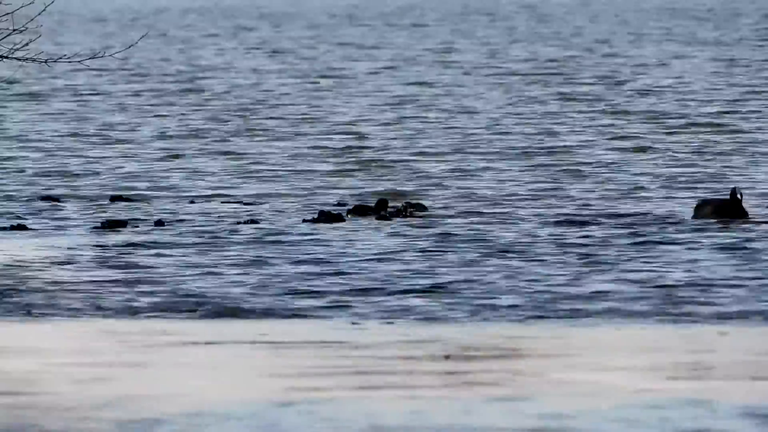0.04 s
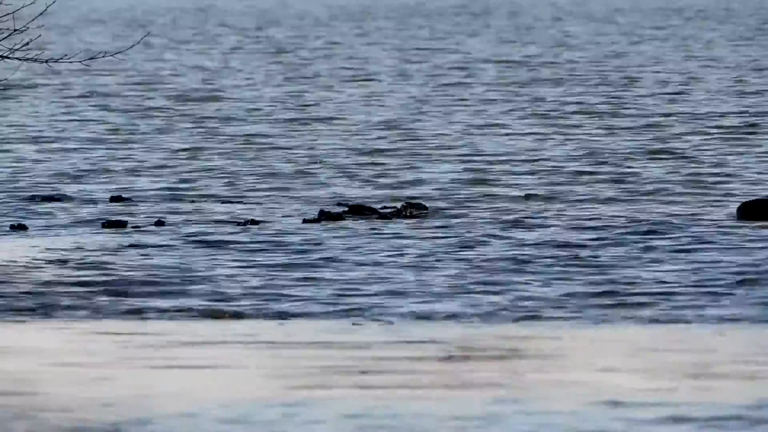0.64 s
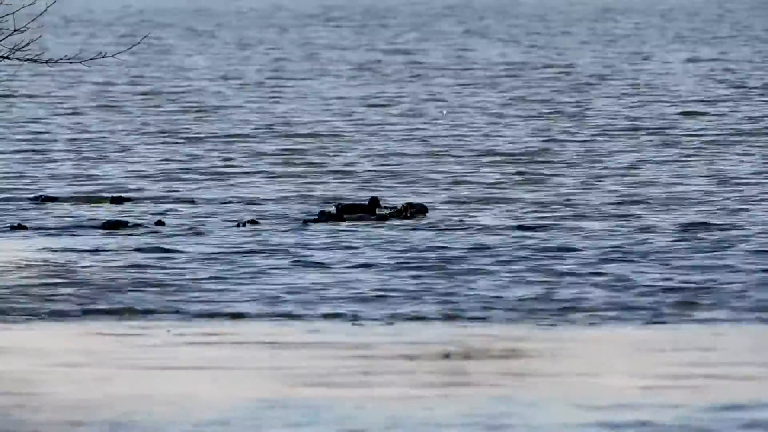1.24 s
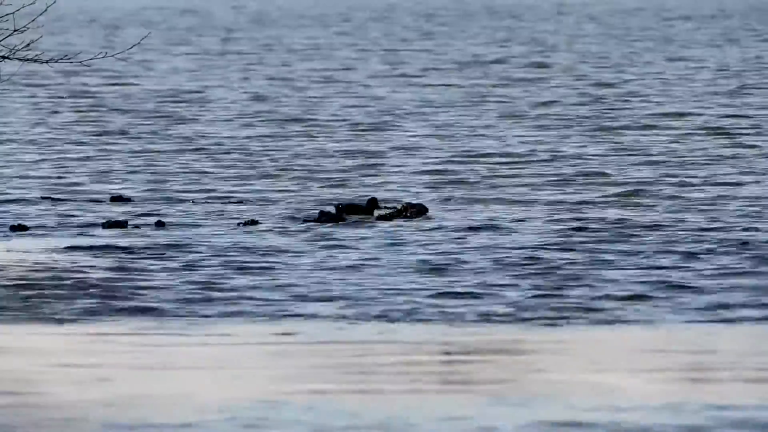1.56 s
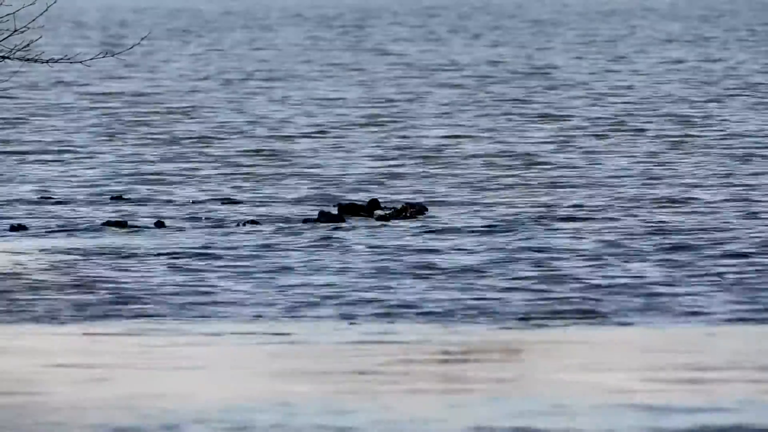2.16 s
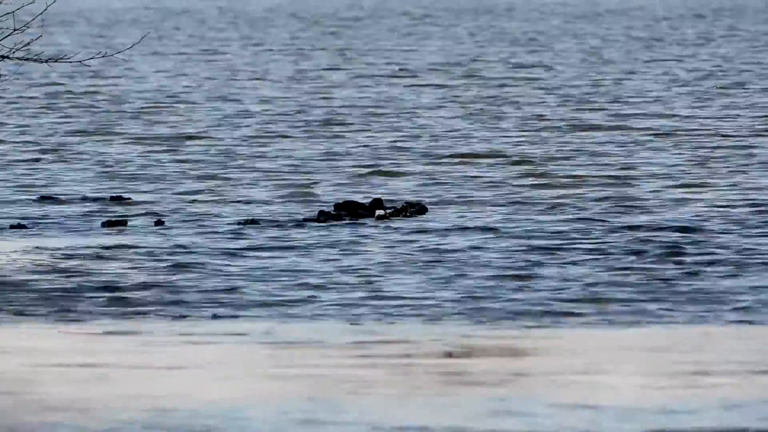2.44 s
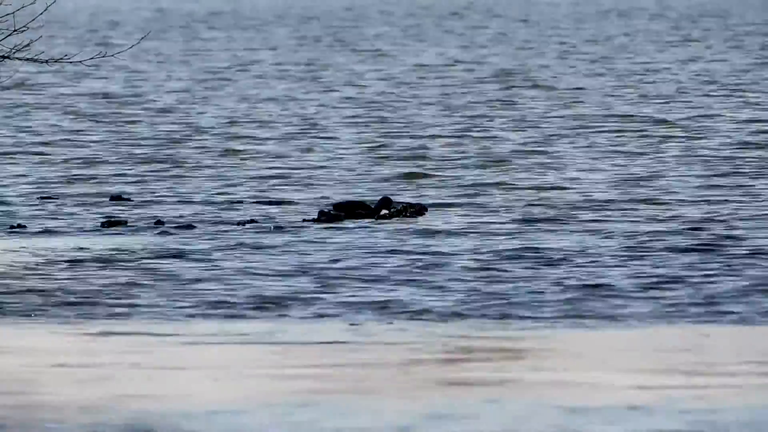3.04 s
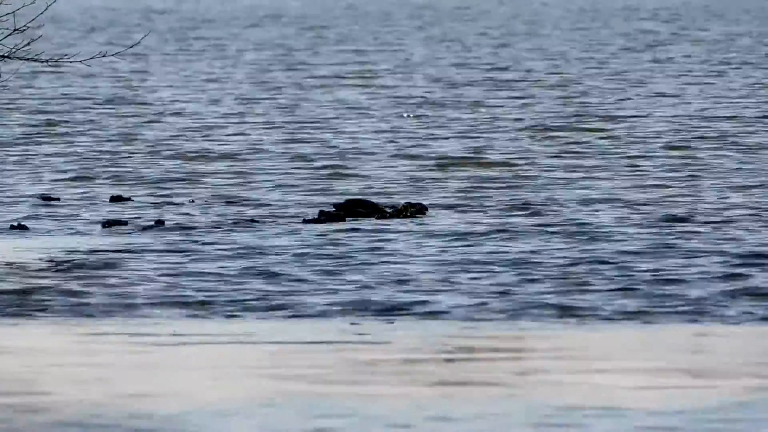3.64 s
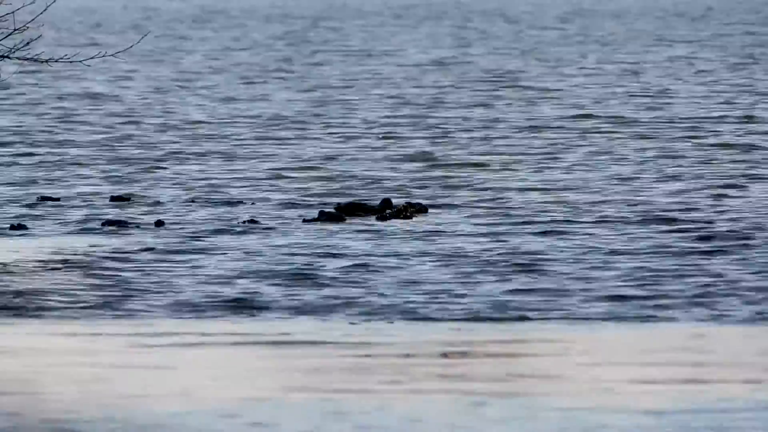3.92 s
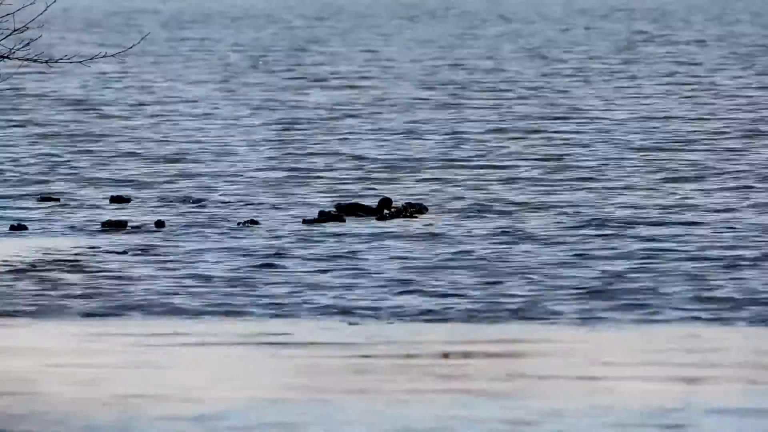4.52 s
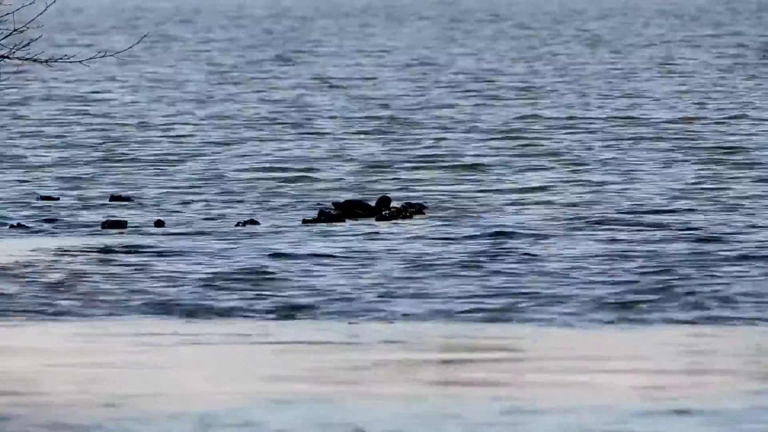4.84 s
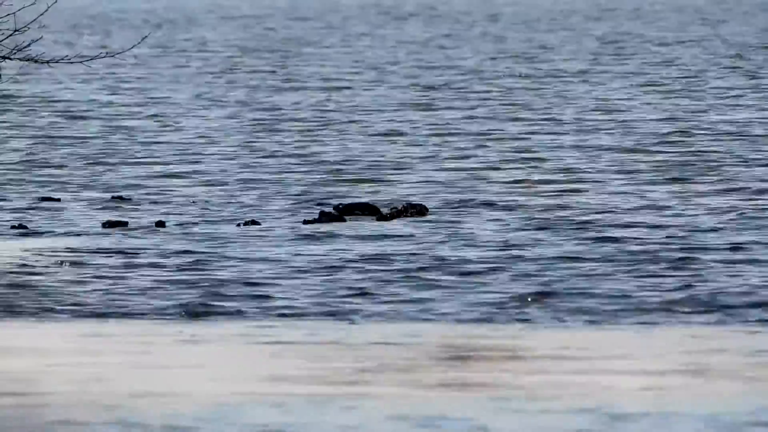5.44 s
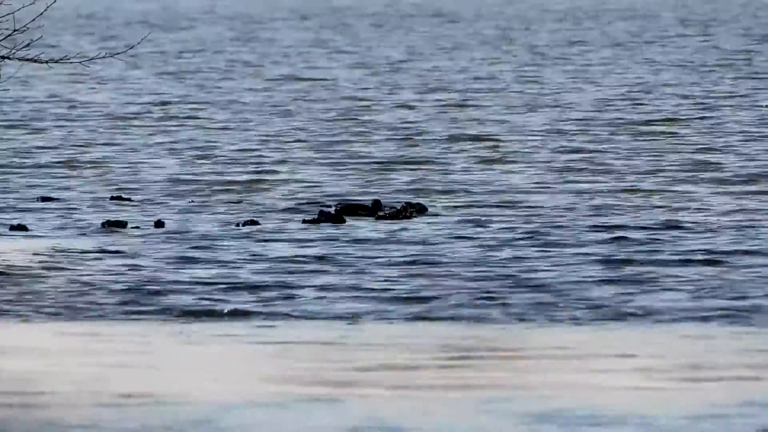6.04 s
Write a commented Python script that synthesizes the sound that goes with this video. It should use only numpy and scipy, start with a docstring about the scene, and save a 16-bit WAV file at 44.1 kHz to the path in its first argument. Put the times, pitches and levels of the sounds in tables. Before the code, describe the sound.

On the shore of a partly frozen lake, a breeze rumbles and flutters unevenly on the microphone over a soft wash of open air. In the first half, coots give a few faint, short, hoarse yelps far out on the water. Later, ripples swell gently and one small wave slaps under the ice edge with a low gulp. A light tap on the camera follows as the wind grows a little stronger.

```python
"""The shore of a breezy, partly frozen lake, heard through a camera's two microphones.
Wind rumbles on them over a far wash of open air. The lens stabiliser whirrs; the camera is tapped.
Ripples wash up to the ice edge, one slaps under it, trapped air gulps, and there are tiny ticks.
Out on the water, coots give a few faint, hoarse yelps, each trailed by short echoes."""
import sys
import numpy as np
from scipy import signal
from scipy.io import wavfile
from scipy.ndimage import uniform_filter1d

SR = 44100
rng = np.random.default_rng(int(sys.argv[2]) if len(sys.argv) > 2 else 0)


def generate_wav(signal):
    """Clip the signal to [-1, 1] and save it as 16-bit WAV at the path in sys.argv[1]."""
    frames = np.transpose(np.atleast_2d(signal))
    scaled = np.clip(frames, -1, 1) * 32767
    pcm = np.round(scaled).astype(np.int16)
    wavfile.write(sys.argv[1], SR, pcm)


N = 276948
TIME = np.arange(N) / SR
SIDES = np.array([[1], [-1]])  # plus for the left channel, minus for the right

# Below, "pan" is how much louder the left side is, and "fade" is the time to die away by 60 dB.
# Tone of the far open air: (frequency [Hz], relative level [dB])
AIR_TONE = [(20, 12.5), (100, 6), (200, 4.5), (320, 2), (420, 0.5), (600, -0.5), (800, -2.5), (1050, 1.5),
            (1600, 1.5), (2100, -9.5), (2700, -9.5), (3800, -18), (6000, -25), (12000, -36)]
# How alike far sounds are on both sides: (frequency [Hz], likeness [1 same, 0 unrelated, -1 opposite])
AIR_LIKENESS = [(50, 0.54), (300, 1), (650, 0.57), (1050, 0.27), (1400, 0.1), (2500, 0.15), (4500, -0.24),
                (9000, 0)]
# Tone of the microphones' hiss: (frequency [Hz], relative level [dB])
HISS_TONE = [(100, 2.3), (2000, 3.7), (4000, 6.1), (6300, 4.1), (10000, 1.4), (15500, 0.54)]
# Notes the camera body rings at: (pitch [Hz], width [Hz], level [dB], pan [dB], left lead [radians])
BODY_NOTES = [(672, 81, -70, -2, 0.22), (1235, 77, -78.5, -1.5, 2.5), (1365, 92, -74, -2.5, 1.4),
              (1459, 70, -72.5, -3, 2), (1545, 80, -73, -1, -2.7), (1689, 124, -71.5, -4, -1.5),
              (1800, 100, -67, -4.5, -0.16), (1930, 113, -65, -7, 1.87), (2057, 120, -67, 4, 3),
              (2295, 80, -80.5, -3, 0.6), (2402, 66, -76.5, 0, 2), (2460, 50, -84, 1, 3),
              (2625, 50, -82.5, 3.5, 2), (2950, 80, -84, -1, 1), (3110, 86, -80.5, 2, 0.5),
              (3195, 110, -80, 4, 2.5), (3310, 100, -82.5, 1.5, 3), (3400, 150, -82, 1.5, 3.5)]
# Rings of a soft knock, then a fingertip tap and its bump: (time [s], pitch [Hz], level [dB], fade [s])
TAP_RINGS = [(2.761, 406, -51.5, 0.066), (2.761, 1270, -55, 0.05), (5.4945, 664, -40.5, 0.019),
             (5.4945, 1070, -40, 0.0098), (5.4945, 2400, -57, .005), (5.512, 235, -46, 0.13)]
# Tiny ticks: (time [s], pitch [Hz], width [Hz], level [dB], fade [s])
TICKS = [(1.013, 7300, 2500, -68, .035), (3.338, 3900, 800, -72, 0.026), (3.423, 13000, 4000, -72, .012),
         (5.111, 7000, 1800, -71, .03), (5.659, 7800, 2200, -68, 0.03)]
# The steady breeze: (time [s], level [dB], pan [dB])
BREEZE = [(0.0, -50, 4.5), (0.6, -51.5, 2.5), (1.35, -51.3, 2), (1.6, -50, 0), (1.85, -46, 0),
          (2.4, -48.5, -0.5), (3.0, -47, 1), (3.45, -48, 6), (4.3, -48, 2), (4.65, -48, 3),
          (5.08, -52, 3.5), (5.3, -44, 2.5), (5.85, -44.5, 0), (6.28, -44.5, 10.5)]
# Gusts on top of the breeze: (start [s], length [s], level [dB], pan [dB])
GUSTS = [(0.27, 0.22, -49.5, 16), (0.654, 0.22, -45.5, 3), (0.74, 0.35, -49, 13), (0.958, 0.23, -48, -9),
         (1.068, 0.19, -49, 12.5), (1.397, 0.17, -45, 12.5), (1.66, 0.39, -47.5, 11.5),
         (2.083, 0.3, -46.5, 12.5), (2.374, 0.16, -49, 12), (2.51, 0.13, -50, 10), (2.684, 0.12, -44, 7),
         (3.022, 0.21, -50.5, 14), (3.495, 0.26, -47.5, 13), (3.757, 0.15, -45.5, 8),
         (3.958, 0.15, -45.5, 7), (4.252, 0.17, -51, 9), (4.387, 0.16, -50.5, 14), (5.3, 0.27, -44.5, -4),
         (5.717, 0.27, -48.5, 11), (6.04, 0.29, -47, 13)]
# Tone of the rumble from big swirls of air: (frequency [Hz], relative level [dB])
RUMBLE_TONE = [(14, -4.5), (24, 0.5), (36, 0), (50, -4), (75, -10), (105, -20.5), (160, -29.5), (300, -50)]
# Tone of the flutter from small swirls: (frequency [Hz], relative level [dB])
FLUTTER_TONE = [(20, -9), (50, 3.5), (85, 4.5), (120, 3), (170, -3), (240, -9), (310, -12), (420, -23.5),
                (1000, -48)]
# How much flutter rides on the wind: (time [s], relative level [dB], pan [dB])
FLUTTER_SHARE = [(0.0, -9, -4), (0.7, -16.5, 1), (0.95, -8, 0), (1.5, -8, -5.5), (1.9, -6.5, -6),
                 (2.2, -8.5, -5), (2.47, -16, -5), (2.75, -10, -5), (3.13, -11, -15), (3.38, -15.5, -9),
                 (3.88, -14, -5), (4.06, -5.5, -3), (4.22, -12, 1), (4.5, -11, -3), (5.2, -9.5, -6),
                 (5.48, -5, -9), (5.8, -4.5, -2), (6.28, -8.5, -3)]
# Ripples washing up to the ice: (peak time [s], rise [s], fall [s], level [dB])
WASHES = [(0.5, .6, 0.62, -65.5), (0.98, 0.76, 0.51, -65.7), (4.45, 0.58, 0.53, -61.3),
          (4.84, 0.45, 0.38, -61)]
# Tone of their soft rush: (frequency [Hz], relative level [dB])
WASH_TONE = [(250, -3.5), (600, 0), (950, 5), (1400, -4), (2000, 0), (2700, -9), (4200, -21), (7000, -30),
             (12000, -42)]
# Strength of the droplets in that rush: (pitch [Hz], relative level [dB])
DROPLET_TONE = [(850, 0), (1400, -1.5), (2400, 1), (3200, -7.5), (5000, -11)]
# Gulps of air under the ice: (time [s], starting pitch [Hz], level [dB], fade [s])
GULPS = [(1.145, 244, -46.5, 0.14), (2.029, 216, -48, 0.067), (4.71, 200, -38, 0.085),
         (4.746, 182, -41.5, 0.091), (4.812, 205, -48, 0.094)]
# Noise bands of the slap under the ice: (pitch [Hz], width [Hz], level [dB], rise [s], fade [s])
SLAP_BANDS = [(177, 110, -51.5, 0.009, 0.94), (1040, 350, -53.5, 0.0037, 0.16),
              (1580, 620, -46, 0.0027, 0.15), (2480, 460, -55, .0012, 0.1), (3250, 500, -66, .004, 0.1)]
# Coot yelps: (time [s], length [s], first pitch [Hz], last pitch [Hz], level before the throat [dB],
# overtone boost [dB], roughness [0-1], direction [0 ahead, 1 left])
YELPS = [(0.922, 0.09, 967, 992, -61, -18, .3, 0.82), (1.0, 0.125, 928, 875, -60.5, -19, 0.35, 0.72),
         (1.155, 0.028, 1080, 1180, -59.5, -14, 0.1, 0.94), (1.504, 0.052, 1130, 816, -60.5, 0.5, .6, 0.89),
         (1.946, 0.056, 1131, 740, -58.5, -2.5, 0.55, 1), (2.178, 0.042, 1002, 1024, -64, -3.5, .3, -.1),
         (3.277, 0.046, 1347, 1187, -59, -14, 0.1, .4), (3.49, 0.046, 1420, 1300, -64, -10, .15, .4)]
# How a coot's throat boosts or softens each overtone: (frequency [Hz], gain [dB])
THROAT = [(800, -5.5), (1050, 1.5), (1400, -4.5), (1850, 10.5), (2200, 0), (2800, -11), (3700, -28),
          (5000, -24), (6400, -19.5), (7500, -27)]

LEFT_DB, LEFT_LEAD_S = 2.5, 0.00019  # a sound from the left is louder and earlier on that side


def from_db(db):
    """Turn decibels into a number to multiply by."""
    return 10 ** (np.asarray(db) / 20)


def unit_power(x):
    """Scale a sound so that its average power is 1."""
    return x / np.sqrt(np.mean(np.abs(x) ** 2) + 1e-20)


def over_time(rows):
    """Join a table's points with straight lines, giving a value at every sample."""
    times, *columns = np.transpose(rows)
    return [np.interp(TIME, times, column) for column in columns]


def at_hz(points, hz):
    """Look up a frequency in a table, with octaves evenly spaced."""
    frequencies, values = np.transpose(points)
    return np.interp(np.log(hz), np.log(frequencies), values)


def drift(rate_hz):
    """A smooth random wobble, about 1 in size; a higher rate wobbles faster."""
    step, warm_up = 40, 2000
    pole = np.exp(-2 * np.pi * step * rate_hz / SR)
    noise = rng.standard_normal(N // step + warm_up + 2)
    slow = signal.lfilter([1], [1, -2 * pole, pole * pole], noise)[warm_up:]
    return np.interp(np.arange(N) / step, np.arange(len(slow)), unit_power(slow))


def shaped_noise(tone, likeness, flicker_db):
    """Stereo noise built from half-octave bands, each flickering on its own."""
    out, edges = 0, 12 * 2 ** np.arange(0, 11, 0.5)
    white = rng.standard_normal((2, 2, N))
    for k, (low, high) in enumerate(zip(edges, edges[1:])):
        if low > tone[-1][0]:
            break
        band = signal.butter(2, [low, high], "band", fs=SR, output="sos")
        shared, opposite = signal.sosfilt(band, white[k % 2])
        hz = np.sqrt(low * high)
        alike = likeness if np.isscalar(likeness) else at_hz(likeness, hz)
        gain = from_db(at_hz(tone, hz) + flicker_db * drift(9.5))
        out = out + gain * (np.sqrt(1 + alike) * shared + np.sqrt(1 - alike) * opposite * SIDES)
    return unit_power(out)


def ringing_noise(hz, width):
    """Noise that rings around one pitch, as complex numbers ready for to_stereo."""
    pole = np.exp((2j * hz - width) * np.pi / SR)
    ringing = signal.lfilter([1], [1, -2 * pole, pole ** 2], rng.standard_normal(N))
    return np.sqrt(2) * unit_power(ringing)


def to_stereo(x, pan_db, lead):
    """Send a complex wave to both microphones, the left one ahead by `lead` radians."""
    half = from_db(pan_db / 2) * np.exp(0.5j * lead)
    return np.real([x * half, x / half])


def burst(start, rise, fade, hold=0):
    """A loudness shape: rise quickly, perhaps hold, then die away."""
    age = np.maximum(TIME - start, 0)
    return (1 - np.exp(-age / rise)) * from_db(-60 * np.clip((age - hold) / fade, 0, 10))


def hump(start, rise, fall):
    """A smooth swell from 0 up to 1 and back."""
    return np.sin(np.pi / 2 * np.interp(TIME - start, [0, rise, rise + fall], [0, 1, 0]))


def evened(x, seconds=0.12):
    """Take the slow swells out of a noise."""
    return x / np.sqrt(uniform_filter1d(x ** 2, int(seconds * SR), axis=-1) + 1e-6)


def open_air():
    """Far water and land blend into one soft wash."""
    return from_db(-58.5 + 0.3 * drift(1)) * shaped_noise(AIR_TONE, AIR_LIKENESS, flicker_db=0.54)


def microphone_hiss():
    """Each microphone adds its own even hiss."""
    return from_db(-72.5) * shaped_noise(HISS_TONE, likeness=0, flicker_db=1.0)


def camera():
    """The lens stabiliser shakes the camera body; the electronics add a very faint, pulsing whine."""
    whine_hz, pulses_per_s = 14794, 25
    effort = from_db(0.5 * drift(7.4))
    whirr = sum(from_db(db) * to_stereo(ringing_noise(hz, width), pan_db, lead)
                for hz, width, db, pan_db, lead in BODY_NOTES)
    pulse = unit_power(np.cos(np.pi * pulses_per_s * TIME) ** 3)
    whine = from_db(-94.5) * np.sqrt(2) * pulse * np.exp(2j * np.pi * whine_hz * TIME)
    return effort * whirr + to_stereo(whine, pan_db=3.0, lead=-1.4)


def taps():
    """Light touches start a few rings that die almost at once."""
    rings = sum(from_db(db) * burst(start, 0.00024, fade) * np.exp(2j * np.pi * hz * (TIME - start))
                for start, hz, db, fade in TAP_RINGS)
    return to_stereo(rings, pan_db=-2.0, lead=0.72)


def ticks():
    """Tiny dry ticks close by, each a flash of high noise."""
    clicks = sum(from_db(db) * burst(start, 0.0011, fade) * ringing_noise(hz, width)
                 for start, hz, width, db, fade in TICKS)
    return to_stereo(clicks, pan_db=-0.5, lead=0.64)


def wind_strength_db():
    """The powers of the breeze and the gusts add up at each microphone."""
    breeze_db, breeze_pan_db = over_time(BREEZE)
    power = from_db(breeze_db + SIDES * breeze_pan_db / 2) ** 2
    for start, length, db, pan_db in GUSTS:
        gust = from_db(db + SIDES * pan_db / 2) * hump(start, length / 2, length / 2)
        power = power + gust ** 2
    return 10 * np.log10(power)


def wind():
    """Big swirls of air rumble on both microphones; small ones flutter mostly on each alone."""
    strength_db = wind_strength_db()
    share_db, pan_db = over_time(FLUTTER_SHARE)
    rumble_db = strength_db + 0.72
    flutter_db = strength_db - 1.06 + share_db + SIDES * pan_db / 2
    rumble = evened(shaped_noise(RUMBLE_TONE, likeness=0.45, flicker_db=2.0))
    flutter = evened(shaped_noise(FLUTTER_TONE, likeness=0.17, flicker_db=2.5))
    shoves = from_db(1.67 * drift(14))  # churning air comes in short shoves and lulls
    return shoves * (rumble * from_db(rumble_db) + flutter * from_db(flutter_db))


def droplets(per_s=450, ring_cycles=11.3, spread_db=1.5, pitch_count=24):
    """Tiny bubbles and drops along the ice edge each ring for a few cycles."""
    sizes = from_db(spread_db * np.minimum(rng.exponential(1, N), 4)) * rng.choice([-1, 1], N)
    clicks = sizes * (rng.random(N) < per_s / SR)
    pitch_choice = rng.integers(0, pitch_count, N)
    out = 0
    for k, hz in enumerate(np.geomspace(DROPLET_TONE[0][0], DROPLET_TONE[-1][0], pitch_count)):
        pole = from_db(-60 * hz / (ring_cycles * SR)) * np.exp(2j * np.pi * hz / SR)
        ring = signal.lfilter([1j], [1, -pole], clicks * (pitch_choice == k) + 1e-18)
        out = out + from_db(at_hz(DROPLET_TONE, hz)) * to_stereo(ring, rng.normal(0, 5), lead=0)
    return unit_power(out)


def ripples(pan_db=-0.5):
    """A soft rush, dotted with droplets, swells and sinks as each group of ripples reaches the ice."""
    power = sum((from_db(db) * hump(peak - rise, rise, fall) ** 2) ** 2
                for peak, rise, fall, db in WASHES)
    water = shaped_noise(WASH_TONE, AIR_LIKENESS, flicker_db=2.5) + from_db(-4) * droplets()
    return np.sqrt(power) * water * from_db(SIDES * pan_db / 2)


def gulps(rise_s=0.0041, glide_per_s=1.4):
    """Air pockets under the ice ring low and briefly, rising a little in pitch."""
    out = 0
    for start, hz, db, fade in GULPS:
        age = np.maximum(TIME - start, 0)
        cycles = hz * age * (1 + glide_per_s * age / 2)
        out = out + from_db(db) * burst(start, rise_s, fade) * np.exp(2j * np.pi * cycles)
    return to_stereo(out, pan_db=-1.0, lead=0.2)


def slap(start_s=4.701, breaking_s=0.017):
    """A small wave hits the ice edge on the left: a short splash over a hollow rumble from below."""
    out = 0
    for hz, width, db, rise, fade in SLAP_BANDS:
        splash = to_stereo(ringing_noise(hz, width), LEFT_DB, lead=2 * np.pi * hz * LEFT_LEAD_S)
        out = out + from_db(db) * burst(start_s, rise, fade, hold=breaking_s) * splash
    return out


def across_water(x, count=16, echo_db=-11, fade_s=0.35):
    """A far sound bounces off ripples and shore, so scattered, dying echoes follow it."""
    echoes = np.zeros((2, N))
    for k, delay in enumerate(rng.uniform(0.0073, 0.1, 2 * count)):
        side, lag = k % 2, int(delay * SR)
        flip = (-1) ** (k // 2)
        echoes[side, lag:] += from_db(-60 * delay / fade_s) * flip * x[side, :N - lag]
    return x + from_db(echo_db) * x.std() * unit_power(echoes)


def coots():
    """Short yelps: a sliding note and its overtones, shaped by the bird's throat."""
    out = np.zeros((2, N))
    waver, rasp_db = 0.035 * drift(240), 1.5 * drift(300)  # shaky pitch and level sound hoarse
    for start, length, first_hz, last_hz, db, overtone_db, rough, left in YELPS:
        progress = np.linspace(0, 1, int(length * SR))
        span = slice(int(start * SR), int(start * SR) + len(progress))
        slide = first_hz * (last_hz / first_hz) ** (progress ** 0.75)  # fastest at the start
        pitch = slide * (1 + rough * waver[span])
        phase = 2 * np.pi * np.cumsum(pitch) / SR
        opening = np.sin(np.pi / 2 * np.interp(progress, [0, 0.18, 1], [0, 1, 0]))  # peaks early
        swell = from_db(db) * unit_power(from_db(rough * rasp_db[span])) * np.sqrt(2 * opening)
        for k in range(1, 8):
            gain = from_db(at_hz(THROAT, k * pitch) + overtone_db * (k > 1))
            harmonic = swell * gain * np.exp(1j * k * phase)
            lead = 2 * np.pi * k * pitch * left * LEFT_LEAD_S
            out[:, span] += to_stereo(harmonic, left * LEFT_DB, lead)
    return out


def scene():
    """All the sounds add up at the two microphones."""
    background = wind() + open_air() + microphone_hiss() + ripples() + camera()
    return background + across_water(coots()) + slap() + gulps() + ticks() + taps()


def record(dry):
    """The very highest treble is cut off steeply."""
    cutoff_hz = 15800
    return signal.sosfilt(signal.ellip(12, 0.1, 70, cutoff_hz, fs=SR, output="sos"), dry)


dry = scene()
out = record(dry)
generate_wav(out)
```